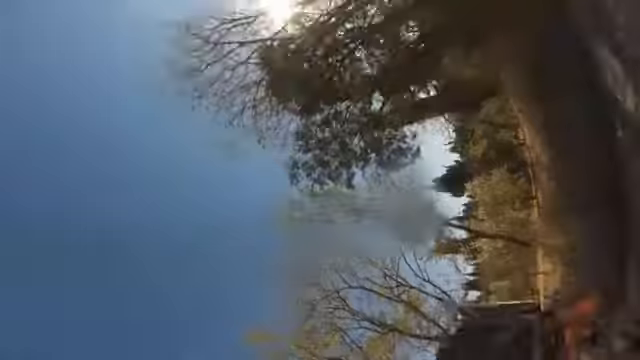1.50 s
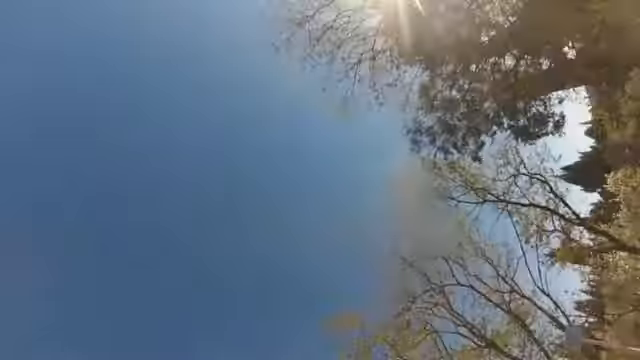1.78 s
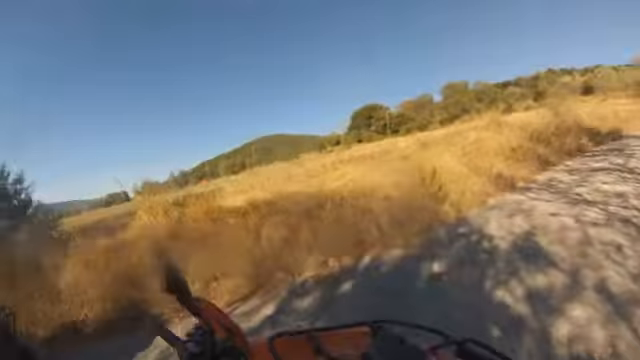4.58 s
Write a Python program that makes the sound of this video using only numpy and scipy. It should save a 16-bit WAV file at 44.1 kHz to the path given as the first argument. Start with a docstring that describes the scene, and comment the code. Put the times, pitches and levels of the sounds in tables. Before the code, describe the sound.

Surges of spray and hollow plastic knocks over the low putter of an ATV rolling through water and up rough ground.

```python
"""A quad bike rolls through a stream and up a rough bank, its single cylinder barely above idle.
Water washes round the tyres and sprays in short surges. Bumps bounce the suspension and knock the
plastic bodywork, hardest near the end; a loose fitting clinks and the wet drive train squeaks.
It is all heard from a camera riding in a closed case, on a mount that sways after every jolt."""
import sys
import numpy as np
from scipy import signal
from scipy.fft import rfft, irfft, next_fast_len
from scipy.io import wavfile
from scipy.ndimage import uniform_filter1d, map_coordinates

SR = 44100
rng = np.random.default_rng(int(sys.argv[2]) if len(sys.argv) > 2 else 0)


def int16_out(signal):
    """Quantize to a 16-bit WAV file."""
    q = np.round(np.clip(np.atleast_2d(signal).T, -1, 1) * 32767)
    wavfile.write(sys.argv[1], SR, q.astype(np.int16))


N = 254545
TIME = np.arange(N) / SR


# how often the cylinder fires: t/s, f/Hz
FIRING_RATE = [(0, 16.55), (1, 16.6), (3.2, 16.75), (3.6, 17.7), (4.8, 17.55), (5.2, 16.6)]
# how hard the engine works: t/s, relative exhaust level/dB, valve clatter level/dB
ENGINE_LOAD = [(0, -56.5, -64), (1.2, -56, -64), (2.2, -58, -73), (3.3, -58, -68.5), (3.7, -56, -74.5),
               (4.4, -64.5, -77.5), (4.9, -63.5, -69.5), (5.77, -63, -75)]
# pitches at which the silencer and frame ring: f/Hz, width/Hz, level/dB
EXHAUST_RINGS = [(50.7, 37, -8), (79.9, 20.7, -1), (138.3, 24, -4.5), (198.3, 98, -14.5), (300, 48, -17)]
# pitches at which the engine's metal case rings: f/Hz, width/Hz, level/dB
CRANKCASE_RINGS = [(468, 160, 5), (975, 170, 2.5), (1350, 280, 5), (1760, 590, 2), (2250, 230, 4),
                   (3400, 260, -20), (4250, 500, -21), (5300, 300, -23.5)]
def engine():
    """Each firing thumps the exhaust; the valves rattle the engine's case in step."""
    exhaust_db, clatter_db = curves(ENGINE_LOAD)
    cycle = np.cumsum(curves(FIRING_RATE)[0]) / SR - .27
    firings = np.diff(np.floor(cycle), prepend=-1) * amp(noise())
    thumps = resonate(firings, EXHAUST_RINGS)
    # the crank turns twice for each firing
    beat = amp(2 * np.cos(2 * np.pi * cycle) + 0.53 * np.cos(4 * np.pi * cycle))
    clatter = resonate(beat * noise(), CRANKCASE_RINGS)
    return amp(exhaust_db + 0.5) * thumps + amp(clatter_db) * clatter


# water round the tyres, thinning as they leave the stream: t/s, relative churn and wash level/dB
WATER_LEVELS = [(0, -62, -59), (0.3, -53.5, -61.5), (0.62, -53.5, -50.5), (0.78, -62.5, -59.5),
                (0.98, -61, -54), (1.25, -67, -61), (1.5, -59, -55.5), (2.0, -62.5, -60.5),
                (2.4, -62.5, -60.5), (2.6, -53, -61), (2.85, -64.5, -62.5), (3.3, -58.5, -61.5),
                (3.52, -55.5, -61.5), (3.9, -59.5, -63), (4.43, -68, -68), (4.53, -48.5, -61.5),
                (4.88, -43, -56.5), (5.2, -72.5, -74.5), (5.77, -78.5, -73.5)]
# tone of the deep churn and of the brighter wash: f/Hz, level/dB
CHURN_TONE = [(200, -3.5), (290, 4.5), (430, -9), (650, -5.5), (900, -12)]
WASH_TONE = [(500, -7), (750, -9), (1400, 2), (2000, -0.5), (2700, -2.5), (3050, -8), (4500, -14.5),
             (5900, -13.5), (6600, -19), (12500, -27.5)]
def tyre_wash():
    """The tyres stir the stream into a patter of many small splashes."""
    churn_db, wash_db = curves(WATER_LEVELS)
    churn = coloured(patter(per_second=230, spread_db=2.5, smooth=1.25), CHURN_TONE)
    wash = coloured(patter(per_second=1800, spread_db=2, smooth=1.0), WASH_TONE)
    return amp(churn_db - 3) * churn + amp(wash_db - 3.5) * wash


# surges of spray: middle t/s, length/s, level/dB, mist level/dB compared with the surge
SURGES = [(0.193, 0.023, -50.5, -16), (0.241, 0.029, -52.5, -12), (0.356, 0.056, -51, -19),
          (0.55, 0.02, -51, -22), (0.667, 0.051, -52.5, -17), (0.843, 0.041, -49, -28),
          (0.999, 0.045, -51.5, -19), (1.439, 0.051, -51, -15.5), (2.141, 0.051, -50, -22),
          (2.334, 0.028, -52.5, -17.5), (2.552, 0.022, -52, -13.5), (2.648, 0.03, -61, -11),
          (2.707, 0.064, -48.5, -19), (3.249, 0.01, -54, -25), (3.308, 0.058, -52, -29),
          (3.348, 0.047, -46, -14.5), (3.563, 0.057, -55, -20), (3.959, 0.069, -64, -49),
          (4.515, 0.025, -56, -44), (4.755, 0.021, -45.5, -10.5), (4.923, 0.12, -59.5, -35),
          (5.148, 0.028, -66, -35)]
# tone of the drops and of the fine mist: f/Hz, level/dB
DROP_TONE = [(350, -13.5), (750, 1), (1200, 2.5), (2400, 3), (3100, -6), (4600, -11.5), (5800, -10.5),
             (6600, -40.5), (9000, -49)]
MIST_TONE = [(3000, -49), (6000, 10), (7500, 10), (9000, 3), (12500, 4.5)]
def spray():
    """The tyres throw up sheets of drops and mist; each lands with its own tone."""
    drop_gain = sum(amp(db) * swell(s, length) for s, length, db, _ in SURGES)
    mist_gain = sum(amp(db + mist_db) * swell(s, length) for s, length, db, mist_db in SURGES)
    impacts = patter(per_second=2800, spread_db=0, smooth=0.82)
    sheets = drop_gain * coloured(impacts, DROP_TONE) + mist_gain * coloured(impacts, MIST_TONE)
    return patchy(sheets, depth_db=1.5)


# gulps of water: middle t/s, length/s, level/dB, typical bubble f/Hz
GULPS = [(0.234, 0.096, -54, 1020), (0.506, 0.033, -53.5, 534), (0.699, 0.026, -54.5, 440),
         (2.971, 0.055, -61, 586), (3.114, 0.045, -55, 700), (3.874, 0.078, -69, 600),
         (4.577, 0.057, -52, 1020), (4.671, 0.032, -37, 1127)]
def gulps():
    """Sloshing water gulps in bursts of bubbles."""
    return sum(amp(db) * bubbles(s, length, hz) for s, length, db, hz in GULPS)


def bubbles(middle_s, length_s, hz, fade_cycles=1.8, count=160):
    """A burst of short bubbles, each swelling softly and rising in pitch as it dies."""
    start, pitch, size = rng.standard_normal((count, 3)).T
    t = np.arange(SR // 80) / SR
    turns = hz * np.exp(.3 * pitch)[:, None] * t
    life = (1 - np.exp(-turns)) ** 2 * np.exp(-turns / fade_cycles) * (1 - t / t[-1])
    rings = amp(2 * size)[:, None] * life * np.sin(2 * np.pi * turns * (1 + 8 * t))
    first_sample = np.abs((middle_s + 0.36 * length_s * start) * SR).astype(int)
    where = first_sample[:, None] + np.arange(len(t))
    burst = np.bincount(where.ravel(), rings.ravel(), N)[:N]
    return burst / np.sqrt(np.sum(burst ** 2) / (length_s * SR))


def jet():
    """A jet of water swishes along a mudguard."""
    return amp(-53) * swell(middle_s=0.623, length_s=0.12) * whistle(centre_hz=2200, width_hz=590)


# blows on the bodywork, though the snaps at 0.184 s and 0.203 s are drops of spray and the one at 0.496 s is a
# plop of water: t/s, relative ring, thud, clack and tick level/dB, the spot's favourite f/Hz
BLOWS = [(0.184, -46, -72, -41, -52, 1000), (0.203, -50, -49, -41, -56, 1000),
         (0.236, -46, -52, -33.5, -52, 1000), (0.253, -33, -50, -37, -42.5, 1000),
         (0.316, -28, -46, -40, -62, 1000), (0.356, -35, -38.5, -40, -47, 804),
         (0.431, -33, -54, -50.5, -79, 400), (0.496, -43, -38, -54, -79, 560),
         (0.744, -41, -63, -48.5, -55.5, 900), (1.133, -32, -54, -52, -78, 680),
         (1.708, -24.5, -33.5, -34, -52.5, 670), (2.597, -57, -51, -62, -56.5, 600),
         (3.098, -35.5, -38, -43, -57, 900), (3.384, -31.5, -41, -39.5, -63, 910),
         (3.457, -38, -51, -46.5, -55, 1000), (3.497, -40, -52, -44, -54.5, 1000),
         (3.551, -27, -29.5, -34.5, -57.5, 300), (3.769, -12.5, -29.5, -35, -60, 720),
         (4.084, -33, -69, -48, -53.5, 1000), (4.169, -12, -26.5, -30, -43.5, 613),
         (4.246, -35, -51, -60.5, -69, 805), (4.471, -46, -67, -52.5, -85, 1000),
         (4.711, -16.5, -19, -32, -50, 400), (4.72, -30, -22, -31, -61, 440),
         (4.739, -21.5, -23.5, -40.5, -56, 420), (4.757, -34, -29.5, -40, -46, 450),
         (4.769, -2.5, -11.5, -20, -36.5, 480), (4.85, -24, -28.5, -45, -68, 540),
         (4.897, -32.5, -42.5, -45.5, -59, 900), (4.924, -41, -53, -45.5, -53.5, 850)]
# notes of the plastic panels: f/Hz, level/dB, fade/s (the time to drop 60 dB, called t60)
PANEL_NOTES = [(297, -6.5, 0.13), (415, -4, .04), (483, -4, 0.03), (574, -11.5, 0.11), (654, -1.5, 0.061),
               (782, -9.5, 0.1), (887, -5, 0.061), (1032, 0.5, 0.035)]
# tone of a blow's low thud, middle clack and high tick: f/Hz, level/dB
THUD_TONE = [(100, -12), (160, 5), (220, 1), (300, -1), (430, -1.5), (600, -3)]
CLACK_TONE = [(700, -6.5), (1100, 7), (1500, 7), (2000, -0.5), (2500, -5), (3100, -6), (3700, -13.5)]
TICK_TONE = [(2800, 5), (3600, -6), (4600, -2), (5800, 2), (6500, -19.5), (9000, -16.5), (12500, -31)]
def knocks(push_s=0.0012, chatter_s=0.0055, db_per_octave=6.5):
    """Each blow pushes the frame, rings the panels and makes hard parts chatter briefly."""
    ring, thud, clack, tick = np.zeros((4, N))
    t = np.arange(SR // 5) / SR
    rise = 1 - np.exp(-t / 0.0007)
    push = -(1 - t / push_s) * np.exp(-t / push_s) * rise ** 2
    chatter = rise * np.exp(-(t / chatter_s) ** 2)
    for s, ring_db, thud_db, clack_db, tick_db, spot_hz in BLOWS:
        # notes far from the struck spot's favourite pitch ring less
        panels = [(hz, db - db_per_octave * abs(np.log2(hz / spot_hz)), t60)
                  for hz, db, t60 in PANEL_NOTES]
        add(ring, s, amp(ring_db - 11) * rise * struck(panels, t) + amp(thud_db + 15.5) * push)
        add(thud, s, amp(thud_db - 1.5) * rise * fade(t, t60=0.085))
        add(clack, s, amp(clack_db - 1.5) * (chatter + amp(-11.5) * fade(t, t60=0.095)))
        add(tick, s, amp(tick_db + 3) * chatter)
    return (ring + thud * coloured(noise(), THUD_TONE)
            + clack * coloured(noise(), CLACK_TONE)
            + tick * coloured(noise(), TICK_TONE))


# bumps the suspension takes: t/s, level/dB, f/Hz, fade/s
BUMPS = [(0.323, -18.5, 94.2, 0.17), (0.36, -16, 59, 0.055), (0.533, -27.5, 66.5, 0.083),
         (0.699, -29.5, 50, 0.16), (1.679, -17.5, 61.3, 0.12), (1.708, -22.5, 150, 0.022),
         (3.55, -14, 69, 0.071), (4.173, -27.5, 84, 0.14), (4.712, -4.5, 112, 0.028),
         (4.737, -8, 128, 0.098), (4.764, -5, 65, 0.05), (4.851, -19, 112, 0.048)]
def bounces():
    """The suspension answers each bump with a low note that dies quickly."""
    out, t = np.zeros(N), np.arange(SR // 2) / SR
    rise = 1 - np.exp(-t / 0.00056)
    for s, db, hz, t60 in BUMPS:
        add(out, s, -amp(db) * rise * fade(t, t60) * np.sin(2 * np.pi * hz * t))
    return out


# how rough the ground is: t/s, steady sway level/dB, tyre rumble level/dB
ROUGHNESS = [(0, -53.5, -58), (0.7, -48, -61), (1.0, -53.5, -61), (1.45, -47, -58), (2.2, -43.5, -59),
             (3.05, -43.5, -54.5), (3.8, -46, -55), (4.1, -38.5, -55.5), (4.4, -39.5, -56), (5.1, -35, -48),
             (5.3, -46.5, -65), (5.77, -68, -71.5)]
# ruts that set the camera mount swaying: t/s, level/dB
RUT_PUSHES = [(0.325, -14.5), (0.53, -25), (0.7, -36), (1.54, -22.5), (1.675, -13), (2.82, -30),
              (2.96, -23.5), (3.3, -27), (3.555, -6.5), (4.29, -33.5), (4.67, -9.5), (4.745, -13),
              (4.895, -9.5)]
# tone of the rumble: f/Hz, level/dB
RUMBLE_TONE = [(35, -12.5), (55, 7), (90, 5), (150, 0.5), (210, -16.5), (300, -13.5), (420, -26)]
def rough_ground(sway_hz=34):
    """Ruts sway the mount, stones rumble through the tyres and the frame rumbles on after bumps."""
    sway_db, rumble_db = curves(ROUGHNESS)
    steady_sway = amp(sway_db + 2.7 * wobble(14))
    rut_sway = shaken(RUT_PUSHES, rise_s=0.03, t60=0.3)
    frame_shake = amp(-18.5) * shaken(BUMPS, rise_s=0.0051, t60=0.52)
    sway = unit(np.sin(2 * np.pi * sway_hz * TIME + wobble(18)))
    rumble = coloured(noise(), RUMBLE_TONE)
    return np.hypot(steady_sway, rut_sway) * sway + np.hypot(amp(rumble_db), frame_shake) * rumble


# shakes that reach a loose metal fitting: t/s, relative level/dB
HARD_SHAKES = [(1.711, -39), (3.5205, -28.5), (4.171, -30), (4.769, -27.5)]
# notes of that fitting: f/Hz, level/dB, fade/s
FITTING_NOTES = [(1282, -5, 0.034), (1517, 1, 0.025), (1890, -8, 0.045), (2226, 0.5, 0.032),
                 (2780, -3, 0.031)]
def clinks():
    """The hardest shakes make a loose fitting ring briefly."""
    out, t = np.zeros(N), np.arange(SR // 10) / SR
    rise = 1 - np.exp(-t / 0.00027)
    for s, db in HARD_SHAKES:
        add(out, s, amp(db - 3) * rise * struck(FITTING_NOTES, t))
    return out


# wet parts rubbing: middle t/s, length/s, level/dB
RUBS = [(0.063, 0.036, -74), (0.113, 0.016, -68), (2.657, 0.026, -57.5), (3.181, 0.018, -66.5)]
# the drive train's whine: t/s, relative level/dB
WHINE_LEVELS = [(0, -84), (0.6, -64), (1.4, -61), (2.0, -60), (2.4, -53), (2.9, -60), (3.4, -59),
                (3.6, -89), (5.77, -100)]
def drive_train():
    """The wet parts that drive the wheels sing faintly as they turn and now and then squeak."""
    squeak_gain = sum(amp(db) * swell(s, length) for s, length, db in RUBS)
    squeaks = squeak_gain * whistle(centre_hz=5840, width_hz=630)
    whine = amp(curves(WHINE_LEVELS)[0] - 12.5) * whistle(centre_hz=2635, width_hz=99)
    return squeaks + whine


# tone of the microphone's hiss: f/Hz, level/dB
HISS_TONE = [(100, 10.5), (1000, 17), (5000, 3), (7000, 3), (9000, -1.5), (12500, -12.5)]
def hiss():
    """The microphone adds a faint, steady hiss of its own."""
    return amp(-78.5) * coloured(noise(), HISS_TONE)


def amp(db):
    """Turn decibels into a gain to multiply by."""
    return 10 ** (np.asarray(db) / 20)


def unit(x):
    """Scale to an average strength (rms) of 1."""
    return x / np.sqrt(np.mean(x ** 2) + 1e-20)


def noise():
    """White noise as long as the scene."""
    return rng.standard_normal(N)


def add(track, s, sound):
    """Mix a sound into the track at time s."""
    part = track[max(round(s * SR), 0):][:len(sound)]
    part += sound[:len(part)]


def curves(rows):
    """Join a table's rows with straight lines: one curve for each column after the time."""
    times, *columns = np.transpose(rows)
    return [np.interp(TIME, times, column) for column in columns]


def wobble(per_second):
    """A smooth curve through random points."""
    points = rng.standard_normal(int(N * per_second / SR) + 4)
    return map_coordinates(points, [TIME * per_second])


def fade(t, t60):
    """Die away by 60 dB every t60 seconds."""
    return amp(-60 * t / t60)


def swell(middle_s, length_s):
    """A flat-topped rise and fall."""
    return 1 / np.sqrt(1 + (2 * (TIME - middle_s) / length_s) ** 6)


def shaken(pushes, rise_s, t60):
    """Strength of a shaking that builds after each push and dies away."""
    power, t = np.zeros(N), np.arange(SR) / SR
    shape = (1 - np.exp(-(t / rise_s) ** 2)) * fade(t, t60)
    for s, db, *_ in pushes:
        add(power, s, (amp(db) * shape) ** 2)
    return np.sqrt(power)


def struck(notes, t):
    """An object's notes ring together, a little differently at every blow."""
    out = np.zeros(len(t))
    for k, (hz, db, t60) in enumerate(notes):
        louder, sharper = rng.standard_normal(2)
        tone = np.sin(2 * np.pi * hz * (1 + 0.018 * sharper) * t + k * k)
        out += amp(db + 1.7 * louder) * fade(t, t60) * tone
    return out


def patter(per_second, spread_db, smooth):
    """Drops of uneven size landing over a share of smooth hiss."""
    drops = (rng.random(N) < per_second / SR) * noise() * amp(spread_db * noise())
    return unit(unit(drops) + smooth * noise())


def filtered(x, response):
    """Multiply each frequency in x by response(hz)."""
    size = next_fast_len(len(x) + 8192)
    return irfft(rfft(x, size) * response(np.fft.rfftfreq(size, 1 / SR)), size)[:len(x)]


def coloured(x, tone):
    """Shape x with a tone table, falling steeply beyond its ends; rms 1."""
    f, db = np.transpose(tone)
    edges = lambda hz: np.minimum(hz / f[0], 1) ** 2 * np.minimum(f[-1] / (hz + 1), 1) ** 4
    return unit(filtered(x, lambda hz: edges(hz) * amp(np.interp(np.log(hz + 1), np.log(f), db))))


def peak(hz, centre, width):
    """How one resonance responds: most strongly at its centre pitch."""
    return 1j * hz * width / (centre ** 2 - hz ** 2 + 1j * hz * width)


def resonate(x, rings):
    """Pass x through side-by-side resonances of alternating sign; rms 1."""
    return unit(filtered(x, lambda hz: sum((-1) ** k * amp(db) * peak(hz, centre, width)
                                           for k, (centre, width, db) in enumerate(rings))))


def whistle(centre_hz, width_hz):
    """A narrow, breathy tone of rms 1."""
    return unit(filtered(noise(), lambda hz: np.exp(-((hz - centre_hz) / width_hz) ** 2)))


def patchy(x, depth_db):
    """Make random patches of pitch and time a little louder or softer."""
    spectrum = signal.stft(x, nperseg=512)[2]
    patches = uniform_filter1d(rng.standard_normal(spectrum.shape), size=8, axis=0)
    patches = uniform_filter1d(patches, size=18, axis=1)
    return signal.istft(spectrum * amp(depth_db * unit(patches)), nperseg=512)[1][:N]


def scene():
    """Engine, water and bumps over a faint whine and hiss, in one channel."""
    motor = engine()
    water = tyre_wash() + spray() + gulps() + jet()
    bumps = knocks() + bounces() + rough_ground() + clinks()
    return (motor + water + bumps + drive_train() + hiss())[None]


# pitches that the air in the camera case boosts or dulls: f/Hz, width/Hz, level/dB
CASE_AIR = [(984, 96, 6.5), (1170, 150, -3.5), (1463, 50, 6), (1696, 110, -4.5), (1860, 110, -1),
            (2310, 200, 3), (3093, 140, -11.5), (3406, 79, 4.5), (4410, 150, 3), (5340, 100, 7),
            (6320, 290, -10.5), (8000, 1800, -3)]
def record(dry, top_hz=12850):
    """The closed case colours every sound; the camera caps peaks and keeps nothing above top_hz."""
    def case(hz):
        bands = [1 + (amp(db) - 1) * peak(hz, centre, width) for centre, width, db in CASE_AIR]
        return np.prod(bands, axis=0)
    boxed = np.clip(filtered(dry[0], case), -.95, .95)
    return filtered(boxed, lambda hz: hz < top_hz)[None]


dry = scene()
out = record(dry)
int16_out(out)
```